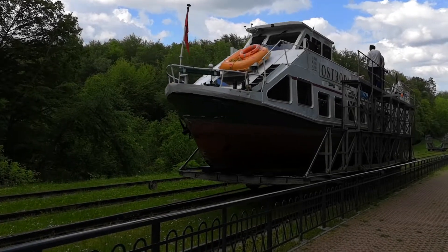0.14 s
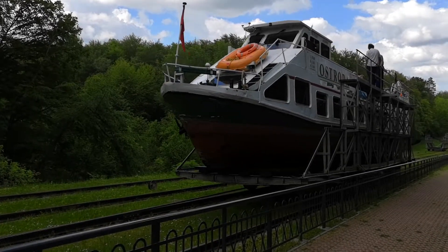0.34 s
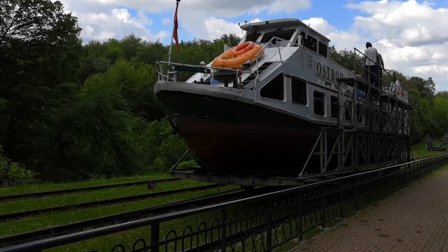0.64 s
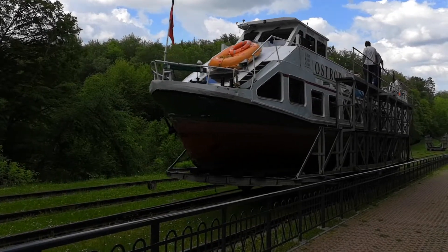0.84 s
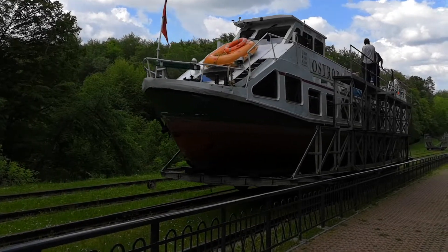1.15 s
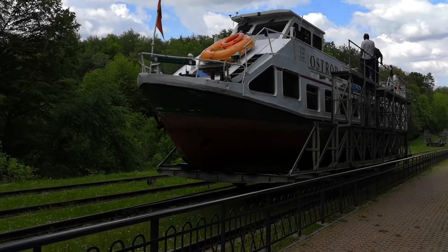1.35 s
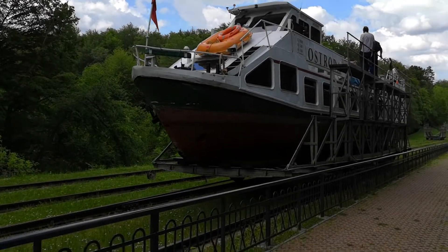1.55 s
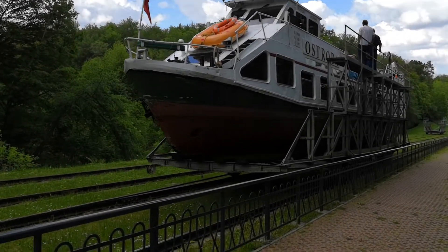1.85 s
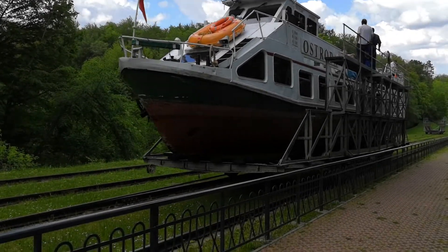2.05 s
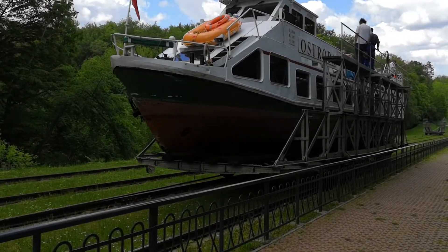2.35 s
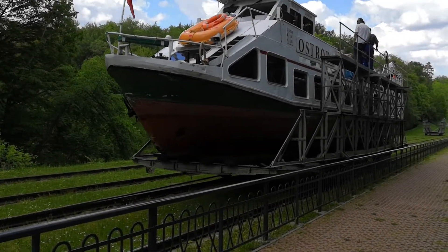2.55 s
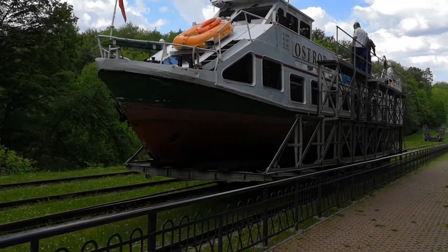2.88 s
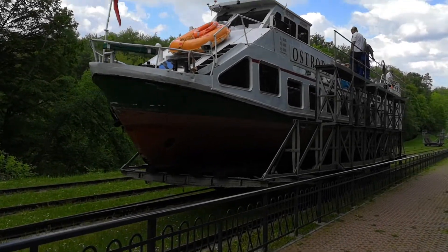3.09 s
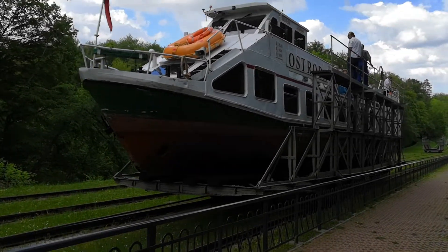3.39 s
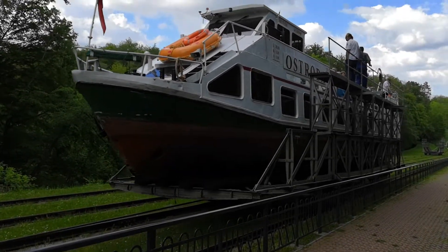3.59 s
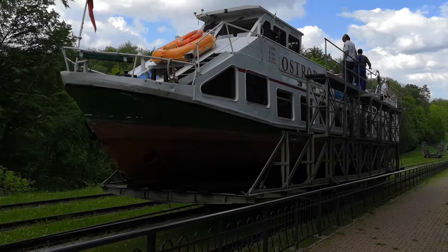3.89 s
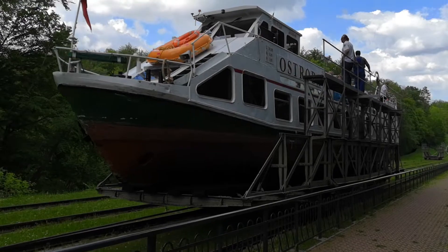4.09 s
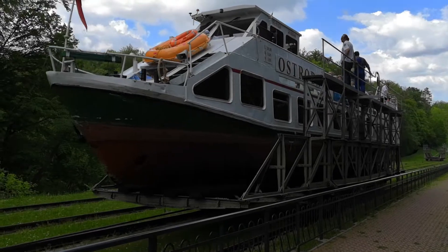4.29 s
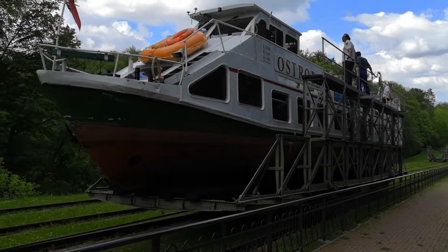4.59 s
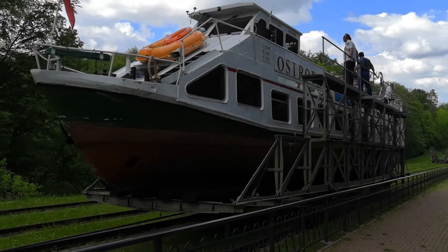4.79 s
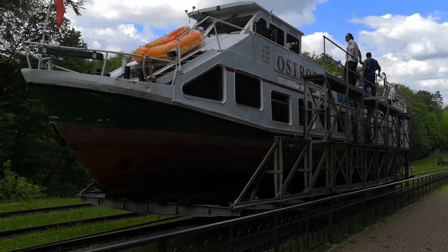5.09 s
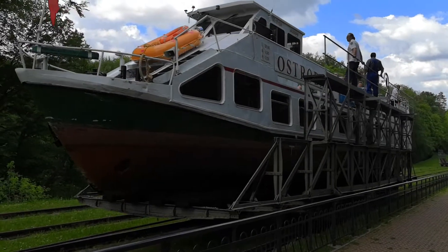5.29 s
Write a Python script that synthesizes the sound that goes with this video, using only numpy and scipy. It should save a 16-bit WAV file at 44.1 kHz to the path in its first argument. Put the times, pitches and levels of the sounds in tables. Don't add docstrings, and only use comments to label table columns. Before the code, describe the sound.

Outdoors, a heavy steel carriage creeps on rails over a faint low rumble, with two booming metallic clunks, rattling struts, and light clicks between.

```python
import sys
import numpy as np
from scipy import signal
from scipy.fft import rfft, irfft, next_fast_len
from scipy.io import wavfile
from scipy.ndimage import uniform_filter1d, map_coordinates

SR = 44100
rng = np.random.default_rng(int(sys.argv[2]) if len(sys.argv) > 2 else 0)


def persist_wave(psi):
    counts = np.round(np.clip(psi, -1, 1) * 32767).astype(np.int16)
    wavfile.write(sys.argv[1], SR, np.atleast_2d(counts).T)


def elevation(decibels):
    levels = np.asarray(decibels, float)
    return 10 ** (levels / 20)


N = 239704
T = np.arange(N) / SR

# (frequency [Hz], width [Hz], level [dB])
BOOM = [
    [(130, 28, -4), (208, 40, 0.5), (268, 51, -0.5), (314, 36, -8), (430, 37, -12.5), (520.5, 10, -10.5)],
    [(130, 39, -3), (212, 24, 1.5), (177, 29, -14), (256, 41, -3.5), (315, 18, -7.5), (431, 19, -7.5),
     (515, 16, -9.5)],
]


def unit(x):
    return x / np.sqrt(np.mean(x ** 2) + 1e-20)


def along(points, hz):
    f, v = np.transpose(points)
    return np.interp(np.log(hz + 1), np.log(f + 1), v)


def gains(rows):
    s, *columns = np.transpose(rows)
    inside = (T >= s[0]) * (T <= s[-1])
    return [elevation(np.interp(T, s, db)) * inside for db in columns]


def swell(start, top, end):
    return np.sin(np.pi / 2 * np.interp(T, [start, top, end], [0, 1, 0])) ** 2


def wobble(rate):
    return map_coordinates(rng.standard_normal(int(N * rate / SR) + 4), [T * rate])


def chatter(spread_db, rate):
    return rng.standard_normal((2, N)) * elevation(spread_db * wobble(rate))


def patchy(depth_db, size, count):
    z = signal.stft(rng.standard_normal((2, N)), nperseg=512)[2]
    field = uniform_filter1d(rng.standard_normal(z.shape[1:]), size=size, axis=0)
    field = uniform_filter1d(field, size=count, axis=1)
    return signal.istft(z * elevation(depth_db * unit(field)), nperseg=512)[1][:, :N]


def filtered(x, response):
    m = next_fast_len(N + SR // 2)
    return irfft(rfft(x, m) * response(np.fft.rfftfreq(m, 1 / SR)), m)[..., :N]


def coloured(spectrum):
    return lambda f: elevation(along(spectrum, f))


def resonances(modes):
    def response(f):
        total = 0
        for k, (hz, width, db) in enumerate(modes):
            damping = 1j * f * width
            total = total + (-1) ** k * elevation(db) * damping / (hz * hz - f * f + damping)
        return total
    return response


def fading(t, t60):
    return elevation(-60 * t / t60)


def ring(t, hz, t60):
    return fading(t, t60) * np.sin(2 * np.pi * (hz * t + rng.random((2, 1))))


def band(t, low_hz, high_hz):
    sos = signal.butter(3, [low_hz, high_hz], "band", fs=SR, output="sos")
    return signal.sosfilt(sos, rng.standard_normal((2, len(t))))


def add(track, s, sound):
    at = round(s * SR)
    track[:, at:at + sound.shape[-1]] += sound[..., :N - at]


def shaking(hums, start, rise, top_db, fade, lasts):
    t = np.maximum(T - start, 0)
    settle_db_per_s, linger_db, linger_db_per_s = 99.5, -19.5, 24
    shake = elevation(-fade * t - settle_db_per_s * np.maximum(t - lasts, 0))
    linger = hums * elevation(linger_db - linger_db_per_s * t)
    return (1 - np.exp(-(t / rise) ** 3)) * elevation(top_db) * (shake + linger)


def drops():
    drop_times = [1.5174, 4.066]
    # (rise [s], top [dB], fade [dB/s], duration [s])
    shake_parts = [
        [(0.04, -34, 38, 0.41), (0.011, -35, 38.5, 0.37), (0.06, -37.5, 24, 0.32), (0.088, -44.5, 36.5, 0.33)],
        [(0.024, -39, 5.5, 0.26), (0.013, -31, 46.5, 0.42), (0.014, -36, 40, 0.39), (0.049, -54.5, -10, 0.25)],
    ]
    # (frequency [Hz], width [Hz], level [dB])
    sway_modes = [
        [(48.8, 8.9, 1), (100, 40, -23)],
        [(51.7, 8.2, 3.5), (95, 52, -2)],
    ]
    # (frequency [Hz], density [dB per Hz])
    rattle_spectra = [
        [(290, -46), (500, 3), (936, 1.5), (1260, -2), (3850, -5), (4300, -10.5), (6310, -15.5), (7850, -15.5),
         (8290, -20.5), (12100, -29), (13000, -70)],
        [(290, -7), (500, -0.5), (657, -6.5), (936, -9.5), (1410, -13), (2210, -9.5), (3000, -13.5),
         (3400, -12.5), (4140, -16.5), (7740, -27), (9900, -36), (10800, -43), (13000, -46)],
    ]
    # (frequency [Hz], width [Hz], level [dB])
    strut_modes = [
        [(915, 60, -3.5), (1320, 28, -1), (1660, 91, 2.5), (1995, 83, 4.5), (2520, 77, 5), (2820, 95, 7),
         (3250, 54, 7.5), (3700, 27, 6), (3840, 34, 2), (4770, 35, 10), (5000, 55, -1), (5520, 80, 5)],
        [(904, 160, -0.5), (1250, 55, -3), (1570, 59, 2), (2070, 90, 2), (2470, 40, 4), (2810, 72, 7.5),
         (5100, 100, -6), (7400, 35, -5)],
    ]
    frame = np.zeros((2, N))

    def heavy(f):
        return (f > 20) / (1 + (f / 650) ** 4)

    def below_sizzle(f):
        return 1 / (1 + (f / 4000) ** 6)

    for k, start in enumerate(drop_times):
        sway, boom, rattle, sizzle = [shaking(n > 1, start, *part) for n, part in enumerate(shake_parts[k])]
        swaying = resonances(sway_modes[k])
        booming = resonances(np.multiply(BOOM[k], [1, 1.8, 1]))
        joints, struts = coloured(rattle_spectra[k]), resonances(strut_modes[k])
        steel = lambda f: joints(f) * (1 + 0.82 * np.abs(struts(f)))
        lurch = chatter(spread_db=2, rate=33)
        frame += sway * unit(filtered(lurch, lambda f: heavy(f) * swaying(f)))
        push = chatter(spread_db=0.8, rate=29)
        frame += boom * unit(filtered(push, lambda f: heavy(f) * (0.22 + booming(f))))
        contacts = patchy(depth_db=2, size=3, count=3) * elevation(1.2 * wobble(70))
        frame += rattle * unit(filtered(contacts, lambda f: steel(f) * below_sizzle(f)))
        fizz = chatter(spread_db=2.8, rate=110)
        frame += sizzle * unit(filtered(fizz, lambda f: steel(f) * (1 - below_sizzle(f))))
    return frame


def landings():
    # (time [s], push [dB], clang [dB])
    wheel_blows = [
        [(1.531, -25.5, -35.5), (1.537, -30.5, -27.5), (1.546, -23.5, -28), (1.558, -32, -32),
         (1.566, -21, -32), (1.594, -27, -56)],
        [(4.076, -30, -48), (4.083, -22.5, -32.5), (4.091, -29.5, -30), (4.103, -21, -28),
         (4.121, -29.5, -32.5), (4.149, -28, -57)],
    ]
    # (frequency [Hz], width [Hz], level [dB])
    clang_modes = [
        [(660, 26, -3), (834, 36, -1), (924, 27, 1), (1094, 67, -8), (1240, 51, -6)],
        [(603, 105, 10), (795, 45, 2), (957, 29, -2.5), (1077, 52, 4), (1300, 70, -6.5)],
    ]
    struck, t = np.zeros((2, N)), np.arange(SR // 5) / SR
    soft = (1 - np.exp(-t / .001)) ** 2
    for blows, boom, clang in zip(wheel_blows, BOOM, clang_modes):
        for s, push_db, clang_db in blows:
            for level_db, modes in (push_db, boom), (clang_db, clang):
                for hz, width, db in modes:
                    phase = 2 * np.pi * hz * t + np.array([[0], [rng.normal(0, 2.2)]])
                    level = elevation(level_db + db + rng.normal(0, 2.6))
                    add(struck, s, level * soft * np.exp(-np.pi * width * t) * np.sin(phase))
    return struck


def singing():
    plate_notes = [7757, 11740, 10750, 6850, 3619, 5660, 9850, 8050, 9500, 7750, 8000, 2750, 9100, 4380,
                   2850]
    # (start [s], loudest [s], end [s], level [dB])
    rubs = [(1.595, 1.635, 1.675, -41), (1.59, 1.627, 1.6, -49), (1.577, 1.63, 1.67, -52.5),
            (1.566, 1.59, 1.73, -57), (1.57, 1.61, 1.92, -48.5), (1.59, 1.63, 1.87, -59),
            (1.698, 1.698, 1.82, -52.5), (1.74, 1.86, 2.24, -71.5), (3.105, 3.118, 3.2, -68),
            (4.145, 4.148, 4.18, -64), (4.24, 4.358, 4.59, -65), (4.397, 4.453, 4.47, -48),
            (4.42, 4.476, 4.54, -72), (4.42, 4.56, 4.65, -71), (4.46, 4.54, 4.96, -69)]
    notes = np.zeros((2, N))
    for hz, (start, top, end, db) in zip(plate_notes, rubs):
        phase = 2 * np.pi * hz * T + np.array([wobble(29.88), wobble(52.0)]) * 0.65
        unsteady_db = np.clip(12 * (end - start), 1, 3) * wobble(97)
        notes += elevation(db + unsteady_db) * swell(start, top, end) * np.sin(phase)
    return notes * [[1], [-.55]]


def knocks():
    # (time [s], ring [Hz], level [dB], treble [dB])
    fitting_knocks = [(2.535, 1075, -49, -75), (2.808, 574, -46.5, -81), (2.808, 1040, -52, -79),
                      (2.808, 1470, -56, -79), (2.929, 1370, -61, -80), (2.967, 1380, -60, -80),
                      (2.999, 1560, -50.5, -50), (2.998, 2630, -52, -72), (2.997, 3820, -49.5, -70),
                      (3.059, 2700, -58, -75), (3.003, 1000, -48, -80), (3.012, 1045, -50, -80),
                      (3.245, 1390, -43, -51), (3.245, 2390, -45, -51), (3.251, 995, -40, -52),
                      (3.664, 2410, -45, -46), (3.665, 1050, -49, -70), (3.671, 1600, -41, -52),
                      (3.681, 1900, -47, -60), (3.715, 1240, -37, -48), (3.731, 1354, -35.5, -56),
                      (3.734, 900, -39.5, -59), (3.745, 1340, -47, -60), (3.8, 1840, -52, -68),
                      (3.814, 770, -50.5, -65), (3.815, 1700, -50.5, -70), (3.862, 2730, -54, -65),
                      (4.034, 1600, -56, -62), (4.544, 1430, -46, -80), (4.565, 1710, -49, -85),
                      (4.652, 1780, -51.5, -85), (4.859, 1410, -61, -85), (5.301, 1750, -50, -62)]
    # (time [s], ring [Hz], level [dB], treble [dB])
    joint_jolts = [(1.523, 2600, -51, -80), (1.532, 2560, -46, -80), (1.538, 2340, -42.5, -80),
                   (1.548, 2470, -46, -76), (1.56, 2250, -38, -70), (1.585, 3650, -45, -60),
                   (1.607, 2750, -47, -60), (1.636, 3300, -41, -58), (1.66, 3700, -39, -58),
                   (1.725, 3250, -40, -58), (1.82, 1780, -39, -62), (1.83, 2670, -45, -62),
                   (1.625, 3250, -39, -64), (1.564, 6500, -57, -56), (1.577, 2360, -35.5, -58),
                   (1.597, 3680, -44, -56), (1.652, 2900, -36, -56), (1.678, 2010, -32, -66),
                   (1.685, 2650, -33, -62), (1.7, 4930, -39, -31), (1.716, 3270, -31, -47),
                   (1.736, 1660, -36, -60), (1.76, 3280, -39, -60), (1.8, 2520, -29.5, -44),
                   (1.868, 2910, -38, -64), (4.068, 2800, -67, -80), (4.079, 2740, -44, -80),
                   (4.088, 2410, -30, -76), (4.1, 2050, -31, -57), (4.194, 3200, -35.5, -45.5),
                   (4.196, 2260, -26, -44), (4.246, 2820, -35.5, -41.5), (4.27, 2650, -33, -45),
                   (4.297, 2900, -36, -44), (4.348, 2810, -41.5, -49), (4.423, 2810, -45, -62),
                   (4.439, 2730, -41.5, -52), (4.454, 2780, -42, -60), (4.47, 2710, -49, -66),
                   (4.14, 2070, -47, -72), (4.113, 2780, -35, -66), (4.168, 2020, -41, -56),
                   (4.22, 2110, -42, -44), (4.258, 3040, -38, -43), (4.312, 2900, -41, -48),
                   (4.33, 2760, -36.5, -54), (4.372, 2770, -47, -58), (4.405, 2800, -49, -64)]
    track, t = np.zeros((2, N)), np.arange(SR // 3) / SR
    pairs = []
    for s, hz, db, treble_db in fitting_knocks:
        pairs.append((s, hz, db, hz * 1.75, db - 13, treble_db, .042))
    for s, hz, db, treble_db in joint_jolts:
        pairs.append((s, hz * 0.6, db - 7, hz, db, treble_db, .032))
    for s, low_hz, low_db, high_hz, high_db, treble_db, t60 in pairs:
        low = ring(t, low_hz, t60) + 2.2 * fading(t, t60) * band(t, 0.75 * low_hz, 1.3 * low_hz)
        high = ring(t, high_hz, t60) + 1.8 * fading(t, t60) * band(t, 0.66 * high_hz, 1.3 * high_hz)
        crack = fading(t, 0.036) * (band(t, 4800, 9400) + .1 * band(t, 9400, 15500))
        knock = elevation(low_db) * low + elevation(high_db) * high + elevation(treble_db) * crack
        add(track, s, (1 - np.exp(-t / 0.0006)) * knock)
    return track


def latch():
    # (time [s], level [dB], rise [s])
    latch_snaps = [
        (3.235, -19, 0.0027),
        (3.709, -27.5, 0.00072),
    ]
    # (frequency [Hz], level [dB], decay t60 [s])
    latch_modes = [
        [(628, -12, 0.033), (9200, -18.5, 0.016), (11000, -20, 0.011), (14000, -26, .01), (3200, -5.5, .015),
         (960, -11, 0.031), (1600, 1, 0.02), (1930, -3.5, 0.022), (2490, -0.5, 0.026), (2900, -6, 0.025),
         (3590, -8, 0.018), (5720, -14, 0.018), (4100, -15.5, .012), (7360, -25.5, 0.025)],
        [(587, -11, 0.05), (1140, -4, 0.026), (1510, -0.5, 0.027), (2670, 0, 0.014), (3130, -1, 0.017),
         (3600, -6, .014), (4300, -6.5, 0.016), (5170, -6.5, 0.014), (7250, -17, 0.012), (10250, -23, 0.013)],
    ]
    track, t = np.zeros((2, N)), np.arange(SR // 3) / SR
    for (s, db, rise), modes in zip(latch_snaps, latch_modes):
        rough = 0
        for hz, level_db, t60 in modes:
            grit = 4.8 * fading(t, t60) * band(t, 0.898 * hz, 1.073 * hz)
            rough = rough + elevation(level_db) * (ring(t, hz, 0.72 * t60) + grit)
        add(track, s, elevation(db) * (1 - np.exp(-(t / rise) ** 2)) * rough)
    return track


def ticks():
    # (time [s], peak [dB], frequency [Hz])
    dry_ticks = [(0.236, -54, 9200), (0.244, -54, 8800), (.433, -60, 9300), (0.4644, -58, 7890),
                 (0.4994, -64, 6040), (0.6295, -57, 9500), (0.7265, -56, 9300), (1.197, -45, 9200),
                 (1.279, -51, 9300), (1.9344, -54, 8050), (2.9108, -59, 7840), (2.928, -52.5, 8700),
                 (2.968, -51, 8750), (2.9982, -39, 7540), (3.0598, -48, 9050), (3.5536, -58, 9340),
                 (5.1257, -51, 8300), (5.301, -54, 9500), (5.324, -51, 9300)]
    track, t = np.zeros((2, N)), np.arange(SR // 3) / SR
    for s, db, hz in dry_ticks:
        snap = 0.77 * fading(t, 0.0072) * band(t, 2500, 12000)
        add(track, s, elevation(db) * (snap + 0.5 * ring(t, hz, 0.012)))
    return track


def thumps():
    # (time [s], level [dB], frequency [Hz], decay t60 [s])
    low_thumps = [(.125, -52.5, 65.6, 0.25), (0.728, -51.5, 62, 0.11), (1.44, -43.5, 112, 0.085),
                  (1.568, -61, 58, 0.36), (4.103, -45, 95, 0.4), (3.082, -42.5, 70, 0.15),
                  (3.14, -47.5, 170, 0.075), (3.664, -38, 210, 0.03), (3.741, -38.5, 90.5, 0.032),
                  (3.878, -56.5, 95, 0.33), (4.845, -50.5, 115.6, 0.12), (1.556, -28, 282, .06),
                  (1.599, -34, 70.4, .1), (1.647, -33, 61.4, .1), (1.749, -41, 214, 0.085),
                  (1.529, -34.5, 190, 0.066), (4.072, -29, 125.2, 0.17), (4.073, -36, 330.3, 0.21),
                  (4.092, -25, 208, 0.11), (4.142, -27.5, 214.2, 0.089), (4.2, -40, 226, 0.094),
                  (4.24, -37, 120, 0.1), (4.272, -50, 115, 0.071), (4.324, -47, 112, 0.076),
                  (4.094, -41.5, 430, 0.12)]
    track, t = np.zeros((2, N)), np.arange(SR // 3) / SR
    for s, db, hz, t60 in low_thumps:
        soft = 1 - np.exp(-t / 0.018)
        add(track, s, elevation(db + 13.5) * soft * ring(t, hz, t60) * np.cos(2 * np.pi * t))
    return track


def scrape():
    # (start [s], loudest [s], end [s], level [dB])
    bolt_slide = (3.59, 3.63, 3.72, -55.5)
    start, top, end, db = bolt_slide
    grind = resonances([(1210, 3000, -4.0), (1890, 120, 6.0), (2600, 490, -5)])
    grinding = unit(filtered(chatter(spread_db=1.6, rate=120), lambda f: grind(f) ** 2))
    return elevation(db) * swell(start, top, end) ** .6 * grinding


def birds():
    # (time [s], frequency [Hz], level [dB])
    near_call = [(4.93, 6800, -80), (4.941, 8280, -62.5), (4.959, 7910, -52.5), (4.983, 8030, -67),
                 (4.987, 8600, -63), (4.996, 9700, -80), (5.004, 9300, -78), (5.013, 7550, -80)]
    # (time [s], length [s], from [Hz], to [Hz], level [dB])
    far_chirps = [(0.028, .07, 4000, 4020, -74), (.33, .07, 6600, 6900, -77), (0.9, 0.086, 6500, 6900, -83),
                  (0.973, 0.089, 4120, 4100, -73), (1.327, 0.037, 2990, 3420, -64),
                  (1.447, 0.027, 3000, 3400, -67), (4.861, 0.04, 2050, 2140, -63),
                  (4.982, .04, 4300, 4300, -69), (5.02, .03, 3900, 4000, -75),
                  (5.048, .03, 3200, 3770, -69), (5.228, .03, 3200, 3750, -58),
                  (5.391, 0.033, 3200, 4000, -61.5)]
    whistle = lambda pitch: np.sin(2 * np.pi * np.cumsum(pitch) / SR)
    s, hz, db = np.transpose(near_call)
    burr = 1 + 0.95 * np.sin(2 * np.pi * 165 * T)
    call = gains(np.transpose([s, db]))[0] * burr * whistle(np.interp(T, s, hz))
    for s, length, from_hz, to_hz, db in far_chirps:
        pitch = np.interp(T, [s, s + length], [from_hz, to_hz])
        call += elevation(db + 2.5) * swell(s, s + length / 2, s + length) * whistle(pitch)
    return np.array([call, np.roll(call, 40)])


def air():
    # (time [s], rolling rumble [dB], leaves [dB])
    air_levels = [(0, -58, -62), (2.2, -56, -62), (3.6, -55.5, -63.5), (5.44, -57, -62.5)]
    # (frequency [Hz], density [dB per Hz])
    rumble_spectrum = [(12, -59), (20, -31), (41, -0.5), (63, -1.5), (216, -12.5), (369, -23), (416, -20),
                       (700, -41.5), (910, -20), (1540, -120)]
    # (frequency [Hz], density [dB per Hz])
    leaf_spectrum = [(180, -6), (300, -11), (360, -12), (553, -5), (732, -6.5), (1370, -5), (2110, -1.5),
                     (2950, -7), (3500, -12.5), (4730, -16.5), (6300, -21.5), (9320, -27), (10800, -33),
                     (15600, -32.5)]
    # (start [s], end [s], level [dB])
    rustle_strokes = [(-.05, 0.31, -77.5), (1.154, 1.317, -70), (1.894, 2.2, -78), (2.882, 3.19, -86),
                      (3.238, 3.363, -80), (3.596, 3.798, -83), (5.27, 5.36, -86)]
    # (frequency [Hz], density [dB per Hz])
    rustle_spectrum = [(4000, -30), (6500, -12), (7500, -3), (8300, -7), (9200, 0), (10400, -12),
                       (14000, -24)]
    rumble_gain, leaf_gain = gains(air_levels)
    rolling = chatter(spread_db=1.3, rate=12)
    rumble = rumble_gain * unit(filtered(rolling, coloured(rumble_spectrum)))
    stirring = patchy(depth_db=1.1, size=6, count=14)
    leaves = leaf_gain * elevation(1.5) * unit(filtered(stirring, coloured(leaf_spectrum)))
    strokes = sum(elevation(db) * swell(a, (a + b) / 2, b) ** 0.15 for a, b, db in rustle_strokes)
    rustle = strokes * unit(filtered(chatter(spread_db=1, rate=120), coloured(rustle_spectrum)))
    return rumble + leaves + rustle


def woods(x):
    # (frequency [Hz], decay t60 [s])
    woods_decay = [(300, 0.55), (2000, 0.089), (10000, 0.45)]
    hz, t, z = signal.stft(rng.standard_normal((2, SR // 2)), SR, nperseg=256)
    tail = signal.istft(z * fading(t, along(woods_decay, hz)[:, None]), SR, nperseg=256)[1]
    late = np.pad(x, ((0, 0), (300, 0)))
    return signal.fftconvolve(late, tail / np.linalg.norm(tail[0]), axes=1)[:, :N]


def ports(far, near):
    # (frequency [Hz], likeness [0-1])
    likeness = [(60, 1), (170, .995), (260, .97), (350, .86), (520, .4), (1400, .55), (3000, .35),
                (15000, .2)]
    # (frequency [Hz], phase [rad])
    near_lead = [(25, -.03), (125, -.13), (250, -.3), (430, -.55), (690, -4.2), (1290, -6.4), (3800, -8.6),
                 (9300, -16)]
    # (frequency [Hz], delay [s])
    far_delay = [(200, .0001), (700, .00061)]
    # (frequency [Hz], difference [dB])
    port_tilt = [(60, 0), (200, -.7), (500, -2.5), (1300, -2.5), (4400, -4), (6500, -3), (7750, -7),
                 (15000, -1.5)]
    # (frequency [Hz], difference [dB])
    near_shade = [(350, 0), (520, -2), (1900, 0), (2750, -4), (3600, 1), (5200, -2), (7750, -1), (15000, 0)]

    def placed(pair, shade, blur, lead):
        def mid_side(f):
            turn = np.arccos(np.clip(along(likeness, f), 0, 1) ** blur) / 2
            return np.array([np.cos(turn), np.sin(turn)])

        def left_right(f):
            half_db = (along(port_tilt, f) + shade * along(near_shade, f)) / 2
            half = elevation(half_db) * np.exp(.5j * lead(f))
            return np.array([half, 1 / half])

        mid, side = filtered(pair, mid_side)
        return filtered(np.array([mid + side, mid - side]), left_right)

    distant = placed(far, 0, 2.2, lambda f: -2 * np.pi * f * along(far_delay, f))
    return distant + placed(near, 1, 1, lambda f: along(near_lead, f))


def scene():
    clicks = knocks() + latch() + ticks() + thumps() + scrape()
    calls = birds()
    steel = drops() + elevation(-1.5) * landings() + singing() + clicks
    answer = woods(elevation(-12.5) * clicks + elevation(-10.0) * calls)
    return ports(air() + answer, steel + calls)


def low_pass(x):
    return signal.sosfilt(signal.butter(12, 15730, fs=SR, output="sos"), x)


def record(dry):
    return low_pass(dry)


dry = scene()
out = record(dry)
persist_wave(out)
```